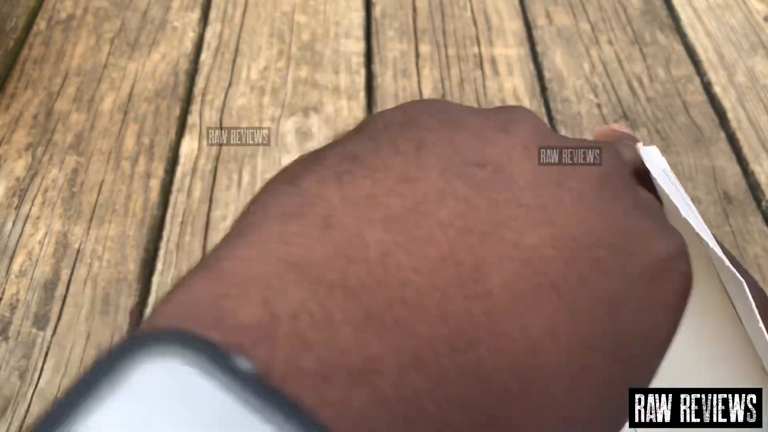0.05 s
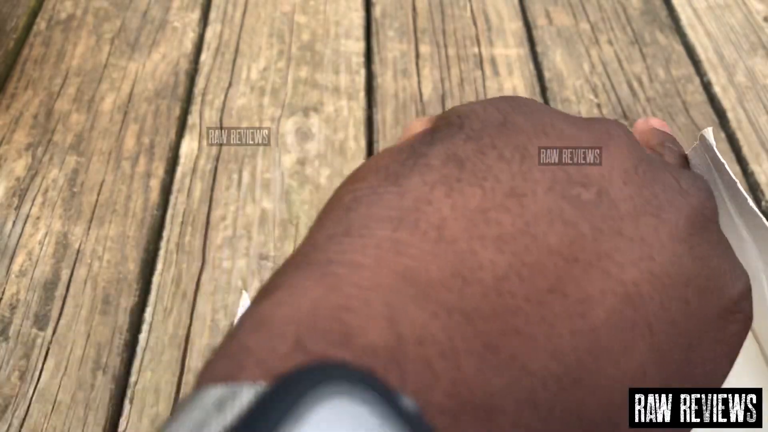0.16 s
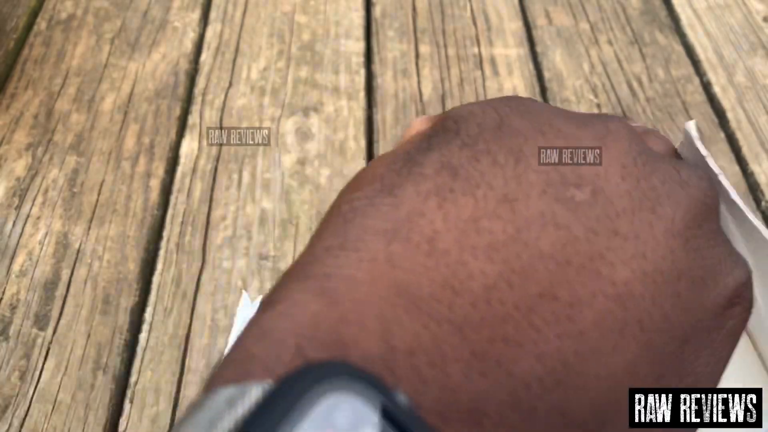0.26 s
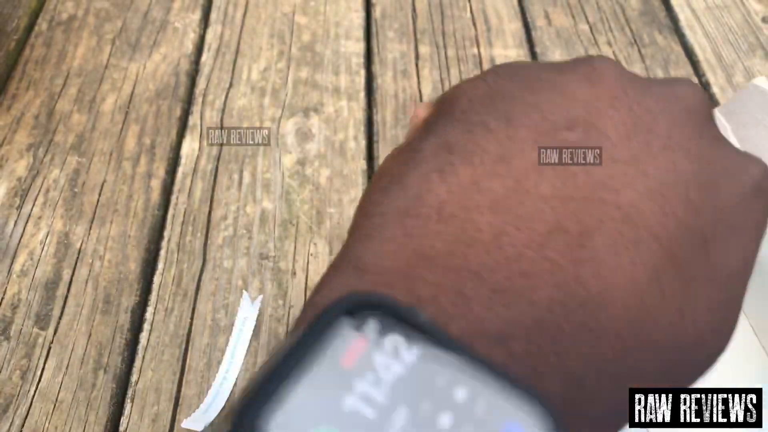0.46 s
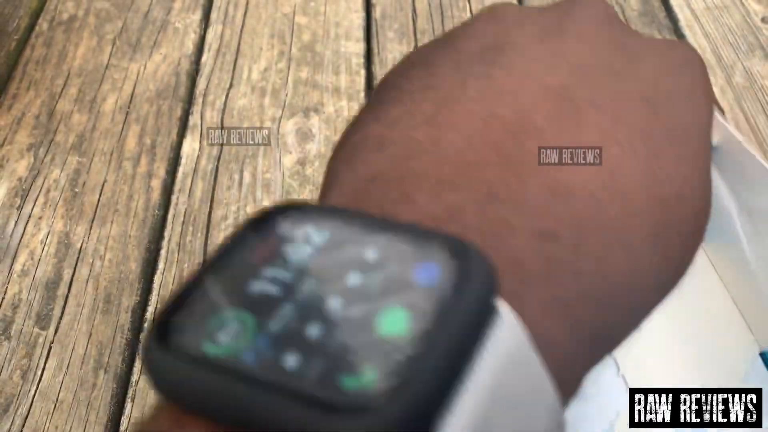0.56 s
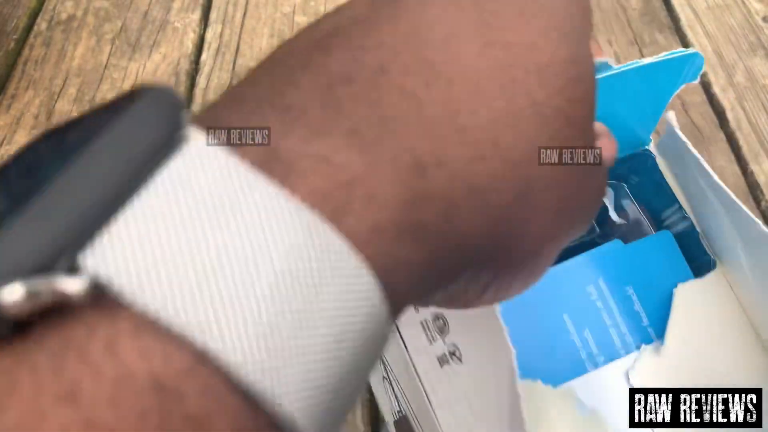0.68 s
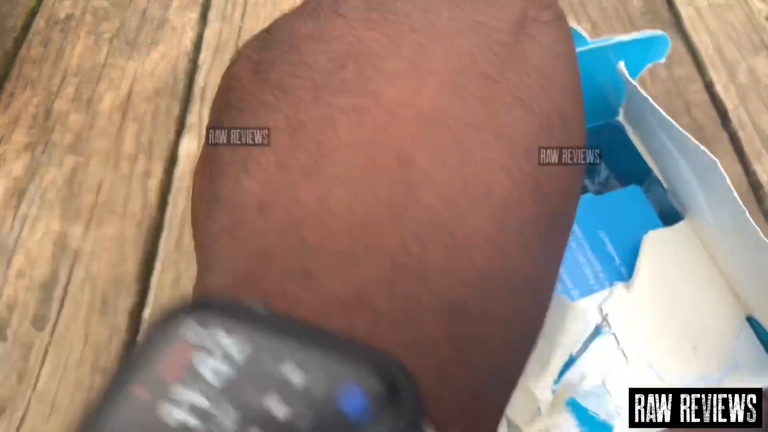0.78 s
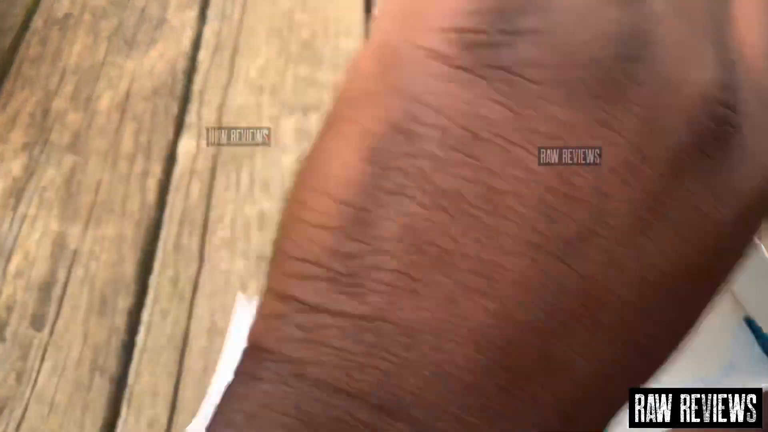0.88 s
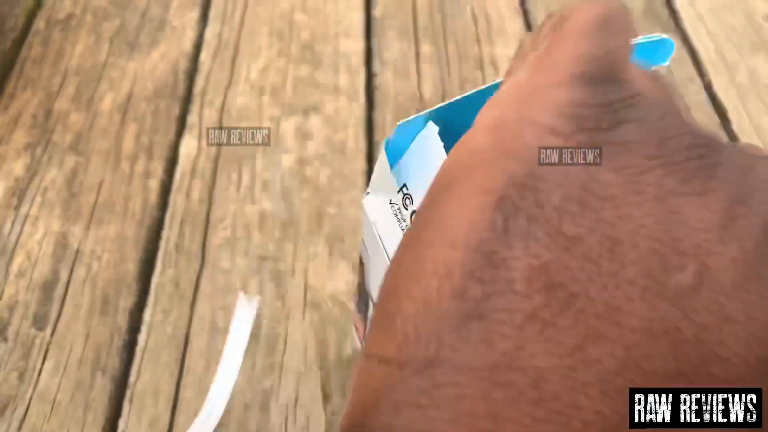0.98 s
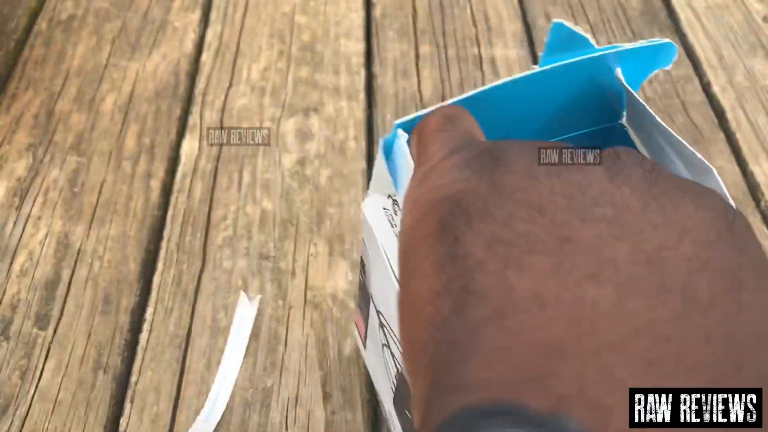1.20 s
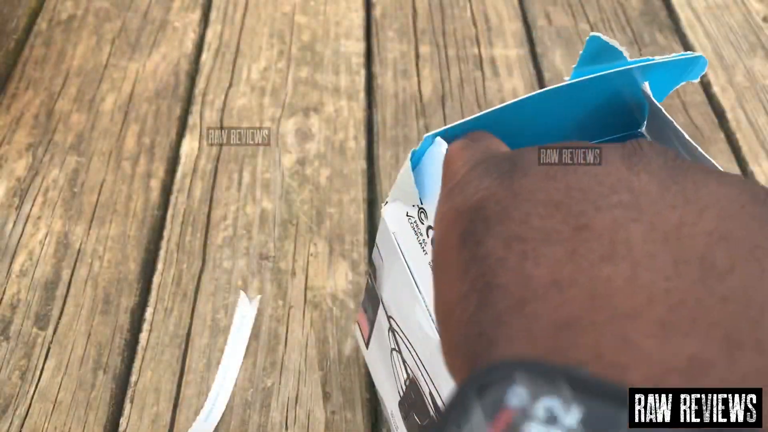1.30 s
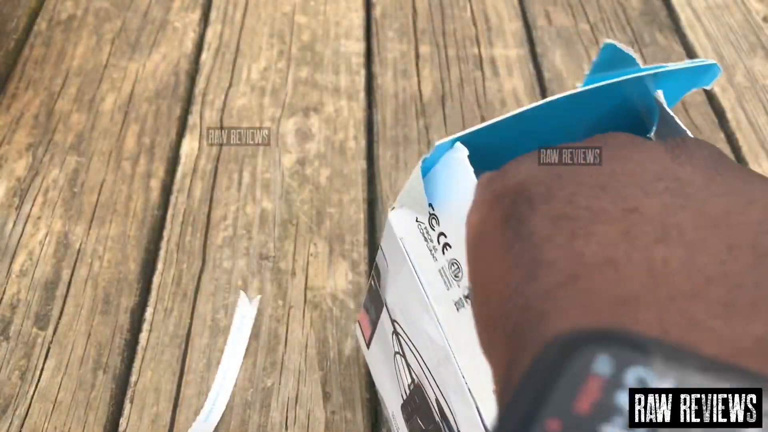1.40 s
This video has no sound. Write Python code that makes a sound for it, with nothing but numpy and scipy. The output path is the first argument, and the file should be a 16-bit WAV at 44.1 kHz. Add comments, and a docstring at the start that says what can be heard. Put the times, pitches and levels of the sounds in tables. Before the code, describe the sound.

Thin cardboard rips and cracks three times as a box seam gives way close to the microphone. Softer scraping and crinkling follow as a hand folds back the flaps, ending in a sharp crunch, with faint open air behind.

```python
"""A thin cardboard box is torn open by hand, close to a phone, over a wooden deck outdoors.
Stick-slip friction and breaking fibres excite the resonances of the card; three times the seam
fractures with a crack and the freed panel flaps. The flaps are then bent aside with creases, ticks
and rubs. Hand, flaps and deck reflect the sound, over handling rumble, a low hum and faint open air."""
import sys
import numpy as np
from scipy import signal
from scipy.fft import rfft, irfft
from scipy.io import wavfile
from scipy.ndimage import uniform_filter1d, map_coordinates

SR = 44100
rng = np.random.default_rng(int(sys.argv[2]) if len(sys.argv) > 2 else 0)


def output_pcm(signal):
    """Save a mono or channel-first signal as 16-bit PCM at the path in sys.argv[1].

    Samples are clipped to [-1, 1] before scaling.
    """
    pcm = np.clip(np.atleast_2d(signal).T, -1, 1) * 32767
    wavfile.write(sys.argv[1], SR, np.round(pcm).astype(np.int16))


N = 63945

# Seam fractures (time [s], crack level [dB], crack rise [s], panel lag [s], panel pitch [Hz],
# panel level [dB], panel rise [s], thump pitch [Hz], thump level [dB], panel pitch drop [fraction],
# edge level [dB], rattle level [dB])
SNAPS = [(0.2635, -12.5, 0.0017, 0.0022, 1030, -13, 0.001, 550, -10, 0.55, -28.5, -18),
         (0.3702, -16, 0.0029, 0.00066, 1740, -7.5, 0.0011, 155, -25, 0.1, -25, -13),
         (0.5803, -8, 0.00093, 0.003496, 1217, -6.5, 0.00087, 279, -10.5, 0.54, -12.5, -12)]
# Fibre bundles breaking (time [s], relative rip level [dB], relative body level [dB], rise [s])
RIPS = [(0.1823, -31, -48, 0.00066), (0.2277, -24, -31, 0.00037), (.234, -25.5, -28, 0.0011),
        (0.248, -25.5, -31, 0.0017), (.257, -19, -16.5, 0.00057), (0.307, -28.5, -33, 0.0036),
        (0.316, -22, -55, 0.00035), (0.472, -37, -41, 0.0011), (0.504, -36.5, -48, 0.0013),
        (0.5627, -26, -33, 0.0018), (0.5757, -20, -18.5, 0.0017)]
# Friction envelope, in groups of rows (time [s], relative bass [dB], body [dB], treble [dB])
FRICTION_LEVELS = [
    [(0.0, -70, -55, -41), (0.016, -53, -47, -47.5), (0.104, -48, -42, -50), (0.12, -39, -37, -40),
     (0.128, -39.5, -50, -48.5), (0.168, -70, -70, -68), (0.18, -55, -38, -48)],
    [(0.204, -35, -43, -51), (0.22, -42, -44, -50), (0.236, -39, -52, -30.5), (0.244, -41, -27, -38),
     (0.252, -48, -42, -36)],
    [(0.276, -32, -36, -46), (0.292, -62, -46.5, -53), (0.312, -32, -36, -39), (0.326, -42.5, -54, -36.5),
     (0.34, -46, -46, -68), (0.35, -68, -64, -44), (0.362, -38, -32.5, -38)],
    [(0.388, -34, -34, -38), (0.426, -46.5, -38, -35), (0.46, -56, -48.5, -50.5), (0.512, -56, -50.5, -45),
     (0.52, -47, -46.5, -48), (0.548, -49, -45, -56), (0.562, -45, -34, -35.5)],
    [(0.605, -28.5, -31, -48), (0.651, -55, -46, -45.5), (0.663, -36, -30.5, -42.5),
     (0.717, -49.5, -56.5, -48), (0.785, -39, -36.5, -52.5), (0.801, -47.5, -54.5, -62),
     (0.87, -51, -61, -58)],
    [(0.888, -57, -49, -54.5), (0.912, -51, -48.5, -46.5), (0.926, -54, -37, -45), (0.94, -41, -43, -54),
     (0.99, -43.5, -36.5, -41.5)],
    [(1.01, -41, -28, -36.5), (1.02, -36.5, -39, -41.5), (1.042, -34.5, -28.5, -40),
     (1.078, -42.5, -43.5, -46.5), (1.09, -48, -31, -39), (1.104, -52, -56, -88), (1.125, -39.5, -53, -64)],
    [(1.145, -45, -36, -45), (1.203, -48, -48.5, -51), (1.245, -39, -34, -40.5), (1.261, -67, -48.5, -62),
     (1.319, -41.5, -34, -38.5), (1.355, -53, -51.5, -56), (1.434, -45, -41, -43)],
]
# Bends of the card (time [s], crunch level [dB], knock level [dB], knock pitch [Hz], rise [s])
CREASES = [(0.0207, -26.5, -24.5, 1420, 0.0012), (0.0771, -32.5, -28, 1470, 0.00078),
           (0.1935, -35.5, -25, 1490, 0.00044), (0.591, -27.5, -52, 1680, 0.0028),
           (.662, -27.5, -30, 860, 0.0025), (0.675, -30.5, -27, 740, 0.00077),
           (0.7731, -39, -34, 700, 0.00035), (.779, -32, -36, 970, 0.00039),
           (0.833, -41, -43, 1070, 0.0023), (.849, -50, -34, 915, 0.0011), (.88, -44.5, -31, 1890, 0.00078),
           (.896, -56, -32.5, 2030, 0.00088), (0.9959, -39, -16, 1297, 0.0012),
           (1.039, -53, -23, 1210, 0.0008), (1.058, -34, -30, 1030, 0.00093),
           (1.086, -47, -27, 1817, 0.0015), (1.135, -42, -33, 1510, 0.002), (1.175, -45, -32, 756, 0.0013),
           (1.2785, -50, -22, 980, 0.00068), (1.293, -35, -23, 1260, 0.0004),
           (1.2968, -30.5, -24, 3580, 0.00098), (1.384, -39, -38.5, 1245, 0.0033),
           (1.4385, -31, -30, 1356, 0.0023), (1.4485, -10.5, -50, 1690, 0.0029)]
# Single fibres and corners ticking (time [s], level [dB])
TICKS = [(0.754, -32), (0.818, -43), (0.927, -39), (0.9984, -31), (1.0104, -47), (1.0378, -26),
         (1.0635, -33), (1.074, -45), (1.087, -45), (1.246, -30), (1.346, -33)]
# Resonances of the box in three bands (frequency [Hz], gain [dB])
BOX_BASS = [(60, -41), (130, 0), (200, -6.5), (290, -0.5), (450, -5), (2000, -56)]
BOX_BODY = [(150, -28.5), (400, -9.5), (600, -2.5), (760, 1), (880, -2), (1050, 2.5), (1180, -5),
            (1320, 1.5), (1500, -5), (1700, -3), (1950, -13.5), (2400, -19.5), (5000, -54)]
BOX_TREBLE = [(800, -7), (1800, 5.5), (2400, 0), (3600, 10.5), (4200, 3), (5000, 0.5), (7000, 1),
              (8300, 4.5), (9700, -16), (11000, -2.5), (13000, -2), (14500, -10), (16000, -15)]
# Spectra of ripping, cracking and crushed card (frequency [Hz], gain [dB])
RIP_SPECTRUM = [(800, -52), (1800, 13), (2600, -4), (3500, 2), (5000, 0), (5900, 6.5), (7000, 4.5),
                (8200, -1.5), (9700, -8.5), (13000, 1), (14500, -11), (16000, -44)]
CRACK_SPECTRUM = [(1000, -23), (3300, -6), (4300, -11.5), (5700, 5.5), (7200, 0), (9500, -5), (12500, 3),
                  (16000, -18)]
CRUNCH_SPECTRUM = [(600, -13.5), (1300, 4), (1950, 2.5), (2600, -8.5), (3600, 3), (4800, -14),
                   (15000, -15.5)]
# The hand bumping the box (time [s], pitch [Hz], level [dB], rise [s])
BUMPS = [(.003, 65, -28.5, 0.01), (0.08, 72.6, -26.5, 0.015), (0.212, 104, -35, .008),
         (0.321, 57, -24, 0.01), (0.6, 204, -27.5, 0.00076), (0.631, 168, -27, 0.0017),
         (0.955, 55, -36, 0.011), (1.311, 287, -31.5, 0.0026)]
# Spectra of handling rumble and open air (frequency [Hz], gain [dB])
RUMBLE_SPECTRUM = [(20, -35), (35, -14), (55, -2), (75, -11), (110, -10), (170, -32), (400, -46.5)]
AIR_SPECTRUM = [(100, 3), (300, -8), (1000, -7.5), (3000, -15), (10000, -31), (14000, -36)]
# Colour of the reflections from the hand and from the deck (frequency [Hz], gain [dB])
HAND_COLOUR = [(300, -10), (1200, -0.5), (2500, 9.5), (8000, 10.5), (13500, 1.5), (15500, -17)]
DECK_COLOUR = [(100, 15), (400, -7), (1800, -0.5), (4000, 5), (14000, 2)]
# Tones of the hum (frequency [Hz], relative level [dB])
HUM_TONES = [(64.6, -48), (107.7, -45)]
# Phase difference between the microphone ports (frequency [Hz], lead of the left [rad])
PORT_LEAD = [(20, 0), (900, 0.53), (2760, 1.02), (3360, 1.5), (3800, 4.5), (6370, 5), (9000, 11.5),
             (10200, 9), (11800, 14), (14100, 14)]
# Level difference between the ports (frequency [Hz], left minus right [dB])
PORT_BALANCE = [(100, 1.5), (700, -1), (1300, -1.5), (15000, 0.5)]
# Treble roll-off of the microphone (frequency [Hz], gain [dB])
MIC_ROLLOFF = [(13500, 0), (15000, -9), (16000, -14)]

EDGE_HZ, EDGE_RISE_S = 3550, 0.001  # a stiff folded edge rings with the crack
CRUNCH_DB, CRUNCH_RISE_S = 1.5, 0.0028  # level relative to the edge
CRACK_POWER = 3.8  # envelope exponent: a crack ends more abruptly than a ring
THUMP_LAG_S, THUMP_RISE_CYCLES = 0.00239, 0.52
SAG_S = 0.0093  # time constant of slackening card
FIBRES_PER_S, FIBRE_SPREAD_DB, HISS_DB = 1500, 2.5, -4.5
GRIP_DB, GRIP_S = 2, 0.0064  # depth and time scale of stick-slip
FRICTION_TRIMS_DB = (-1.5, -1.5, -0.5)  # bass, body, treble
TEAR_START_S, TEAR_END_S = 0.14, 0.58  # friction takes the colour of the rips while the seam runs
FLEX_SHARE, FLEX_S = 0.04, 0.05  # rms shift of the resonances and its time scale
RIP_DB, CREASE_BODY_DB, RUMBLE_DB = -1.5, -7.5, -43
HAND_DB, HAND_T60_S, HAND_MOVE_S = -11.5, 0.017, 0.049
DECK_DB, DECK_T60_S, DECK_GAP_S = -16.5, 0.21, 0.00043
HUM_DB, HUM_WAVER_DB, AIR_DB = -1.5, 3.5, -52.5
CUTOFF_HZ = 16000


def seam_snaps(body):
    """Fracture releases elastic energy: the seam cracks, a panel flaps, the box rattles and thumps."""
    out, crack, crunch = np.zeros(N), resonator(CRACK_SPECTRUM), resonator(CRUNCH_SPECTRUM)
    for (start, crack_db, crack_rise, lag, panel_hz, panel_db, panel_rise,
         thump_hz, thump_db, sag, edge_db, rattle_db) in SNAPS:
        crushed = undb(CRUNCH_DB) * burst(start, CRUNCH_RISE_S, crunch, CRACK_POWER)
        out += undb(edge_db) * (damped_mode(start, EDGE_HZ, EDGE_RISE_S) + crushed)
        out += undb(crack_db) * burst(start, crack_rise, crack, CRACK_POWER)
        out += undb(panel_db) * damped_mode(start + lag, panel_hz, panel_rise, sag)
        out += undb(rattle_db) * burst(start, rise_s=0.0025, response=body)
        thump = damped_mode(start + THUMP_LAG_S, thump_hz, THUMP_RISE_CYCLES / thump_hz, sag=0.052)
        out += undb(thump_db) * thump
    return out


def fibre_rips(body, rip):
    """Tensile failure: each fibre bundle breaks with a bright burst that also excites the box."""
    return undb(RIP_DB) * sum(
        undb(rip_db) * burst(start, rise, rip) + undb(body_db) * burst(start, rise, body)
        for start, rip_db, body_db, rise in RIPS)


def rubbing(bass, body, treble, rip):
    """Stick-slip friction: dense catches of fibre on fibre and a little hiss drive the resonances."""
    times, *levels = np.vstack(FRICTION_LEVELS).T
    t = since(0)
    sizes = undb(FIBRE_SPREAD_DB * np.minimum(rng.exponential(size=N), 4.5))
    catches = (rng.random(N) < FIBRES_PER_S / SR) * sizes * rng.choice([-1, 1], N)
    grip = undb(GRIP_DB * wander(GRIP_S))
    friction = unit(catches * grip) + undb(HISS_DB) * rng.standard_normal(N)
    low, mid, sliding, tearing = (unit(ring(friction, band)) for band in (bass, body, treble, rip))
    high = np.where((t > TEAR_START_S) & (t < TEAR_END_S), tearing, sliding)
    bands = zip((low, flexed(mid), high), FRICTION_TRIMS_DB, levels)
    return sum(undb(trim + np.interp(t, times, level)) * band for band, trim, level in bands)


def flexed(x):
    """Frequency modulation: the resonances drift as the card bends."""
    speed = 1 + FLEX_SHARE * wander(FLEX_S)
    return map_coordinates(x, [np.cumsum(speed)], mode="mirror")


def creases(body, treble):
    """Transient excitation: each bend crunches and sets a panel ringing at its natural frequency."""
    out = np.zeros(N)
    for start, crunch_db, knock_db, hz, rise in CREASES:
        knock = damped_mode(start, hz, rise, sag=0.16) + undb(CREASE_BODY_DB) * burst(start, rise, body)
        out += undb(crunch_db) * burst(start, rise, treble) + undb(knock_db) * knock
    return out


def ticks(treble):
    """Impulse response: single fibres and corners briefly excite the high resonances."""
    return sum(undb(db) * burst(start, rise_s=0.00039, response=treble, power=CRACK_POWER)
               for start, db in TICKS)


def handling():
    """Forced vibration: the hand makes a low rumble and bumps the box."""
    rumble = undb(RUMBLE_DB) * unit(ring(rng.standard_normal(N), resonator(RUMBLE_SPECTRUM)))
    return rumble + sum(undb(db) * damped_mode(start, hz, rise) for start, hz, db, rise in BUMPS)


def hand_scatter(x, paths=4):
    """Moving reflectors: echoes off hand and flaps cross-fade, so their colour keeps shifting."""
    weights = np.array([wander(HAND_MOVE_S) for _ in range(paths)])
    weights /= np.sqrt(np.sum(weights ** 2, axis=0))  # constant power
    return undb(HAND_DB) * sum(w * reflections(x, 0, HAND_T60_S, HAND_COLOUR)[0] for w in weights)


def reflections(x, gap_s, t60_s, colour):
    """Diffuse reflection: an exponentially decaying tail, independent in each channel."""
    age = since(gap_s)
    decay = (age > 0) * np.exp(-np.log(1000) * age / t60_s)
    tail = unit(rng.standard_normal((2, N)) * decay) / np.sqrt(N)
    return ring(x, rfft(tail, 2 * N) * resonator(colour))


def outdoors():
    """Amplitude modulation makes two low tones waver, over the faint noise of open air."""
    out = undb(AIR_DB) * unit(ring(rng.standard_normal((2, N)), resonator(AIR_SPECTRUM)))
    for hz, db in HUM_TONES:
        level_db = db + HUM_DB + HUM_WAVER_DB * wander(4000 / SR)
        out += undb(level_db) * np.sqrt(2) * np.sin(2 * np.pi * (hz * since(0) + rng.random()))
    return out


def mic_ports(x):
    """Path difference: sound reaches the left port first; the midrange is stronger in the right."""
    left_gain = undb(on_bins(PORT_BALANCE) / 2)
    right_delay = np.exp(-1j * on_bins(PORT_LEAD))
    return np.array([ring(x, left_gain), ring(x, right_delay / left_gain)])


def burst(start, rise_s, response, power=1):
    """Noise excitation: a cluster of breaking fibres rings the card, with rms near 1 at its peak."""
    envelope = swell(start, rise_s) ** power
    return unit(ring(envelope * rng.standard_normal(N), response)) * np.sqrt(np.mean(envelope ** 2))


def damped_mode(start, hz, rise_s, sag=0):
    """Damped oscillation: a panel swings, losing the fraction sag of its pitch as it slackens."""
    age = since(start)
    pitch = hz * (1 - sag * (1 - np.exp(-age / SAG_S)))
    return swell(start, rise_s) * np.sin(2 * np.pi * np.cumsum(pitch * (age > 0)) / SR)


def swell(start, rise_s):
    """Critically damped envelope: it reaches 1 in the rise time, then dies away."""
    u = since(start) / max(rise_s, 1e-4)
    return u * np.exp(1 - u)


def wander(seconds):
    """Moving averages smooth noise into a drift of rms 1 on the given time scale."""
    size = max(int(seconds * SR), 2)
    return unit(uniform_filter1d(uniform_filter1d(rng.standard_normal(N), size=size), size=size))


def resonator(points):
    """Minimum-phase response through points of (frequency [Hz], gain [dB])."""
    cepstrum = irfft(np.log(undb(on_bins(points))))
    cepstrum[1:N] *= 2
    cepstrum[N + 1:] = 0
    return np.exp(rfft(cepstrum))


def ring(x, response):
    """Convolution, as a product of spectra."""
    return irfft(rfft(x, 2 * N) * response)[..., :N]


def on_bins(points):
    """Interpolation in log frequency onto the bins of a padded spectrum."""
    hz, value = np.array(points, float).T
    return np.interp(np.log(np.arange(N + 1) * SR / (2 * N) + 1), np.log(hz), value)


def since(start):
    """Seconds since an event, zero before it."""
    return np.maximum(np.arange(N) / SR - start, 0)


def undb(db):
    """Decibels to amplitude ratio."""
    return 10 ** (np.asarray(db) / 20)


def unit(x):
    """Normalisation to rms 1."""
    return x / np.sqrt(np.mean(x ** 2) + 1e-20)


def scene():
    """Superposition of the box, its reflections from hand and deck, and the background."""
    bass, body, treble, rip = map(resonator, (BOX_BASS, BOX_BODY, BOX_TREBLE, RIP_SPECTRUM))
    card = seam_snaps(body) + fibre_rips(body, rip) + creases(body, treble) + ticks(treble)
    card += rubbing(bass, body, treble, rip)
    deck = undb(DECK_DB) * reflections(card, DECK_GAP_S, DECK_T60_S, DECK_COLOUR)
    return mic_ports(card + hand_scatter(card) + handling()) + deck + outdoors()


def record(dry):
    """Band limiting and saturation: the phone rolls off the treble, clips peaks and cuts the top."""
    clipped = np.clip(ring(dry, resonator(MIC_ROLLOFF)), -1, 1)
    lowpass = signal.ellip(8, .2, 80, CUTOFF_HZ, fs=SR, output="sos")
    return signal.sosfilt(lowpass, clipped)


dry = scene()
out = record(dry)
output_pcm(out)
```